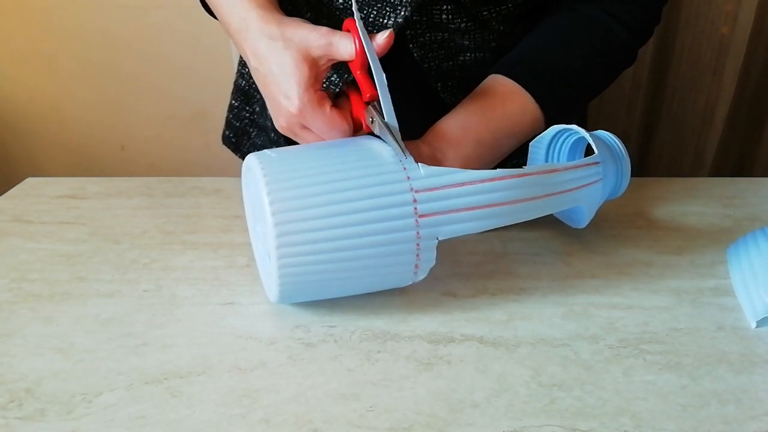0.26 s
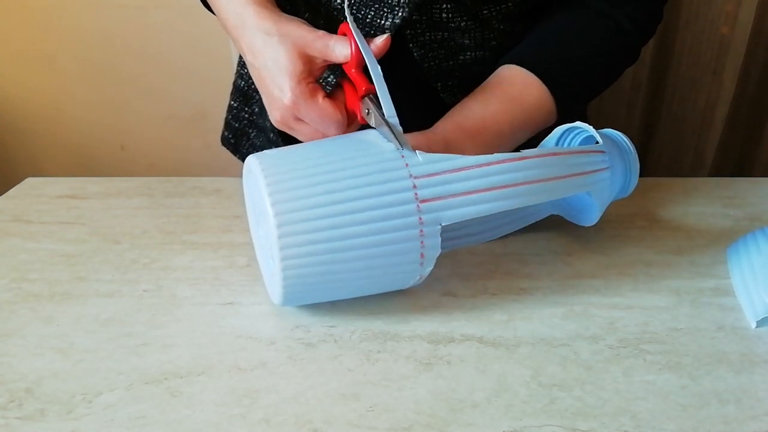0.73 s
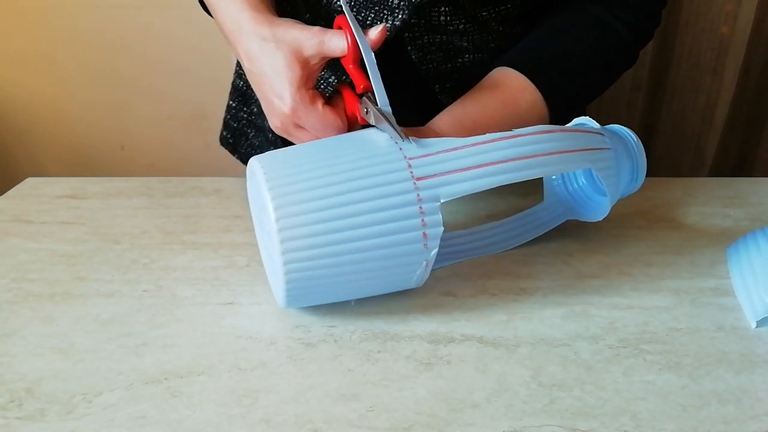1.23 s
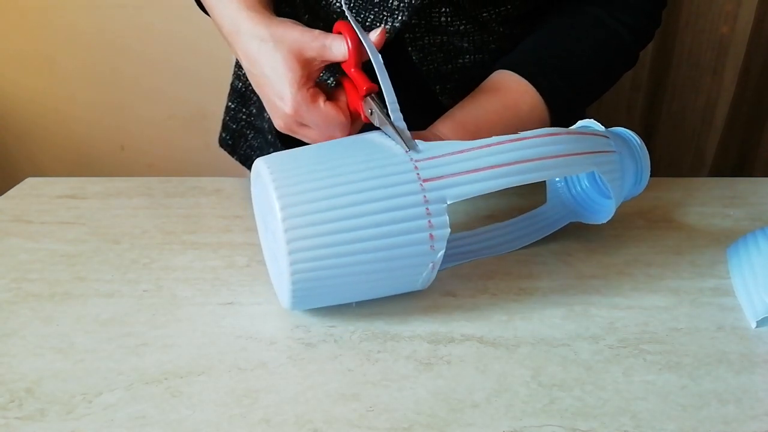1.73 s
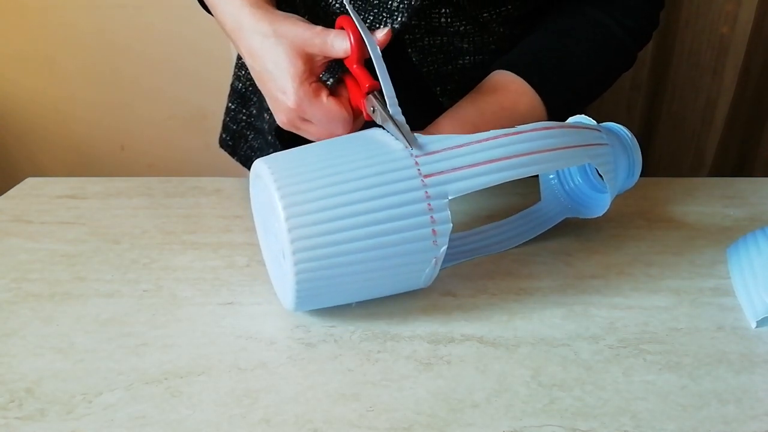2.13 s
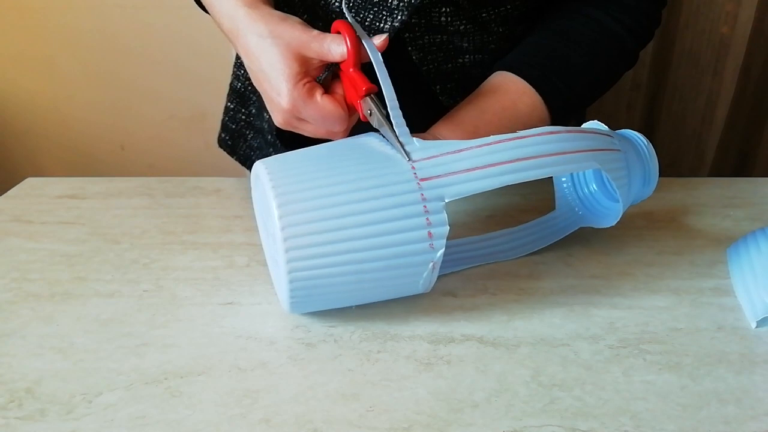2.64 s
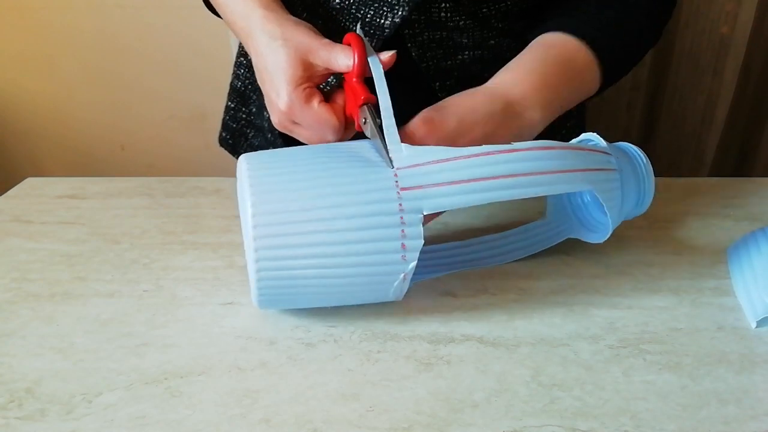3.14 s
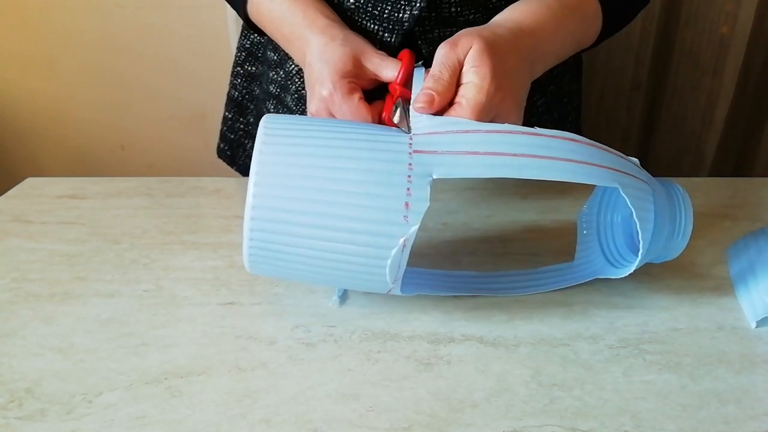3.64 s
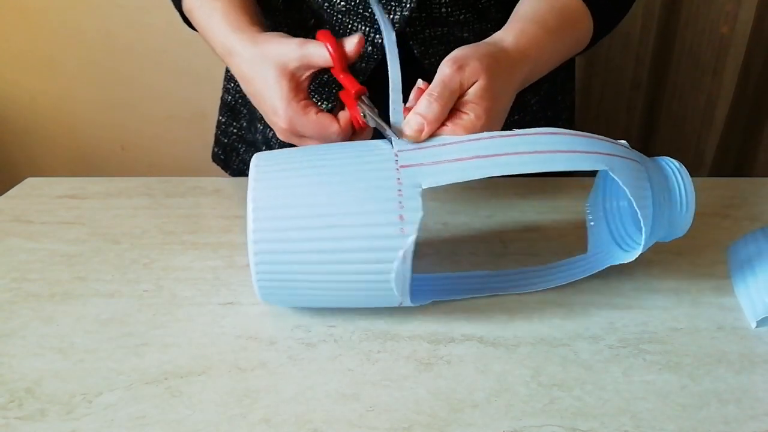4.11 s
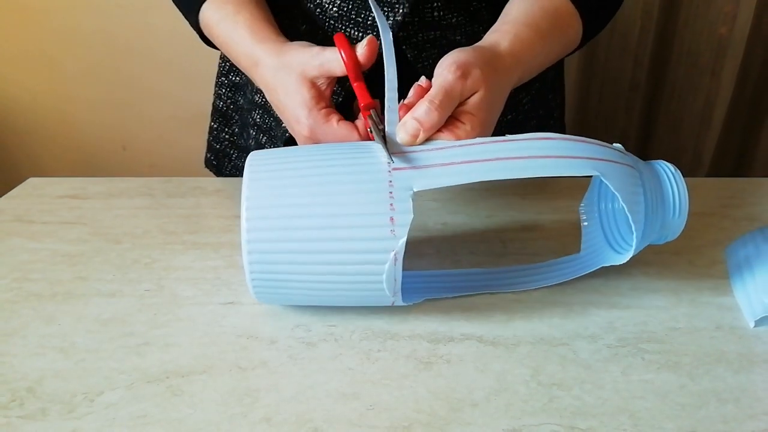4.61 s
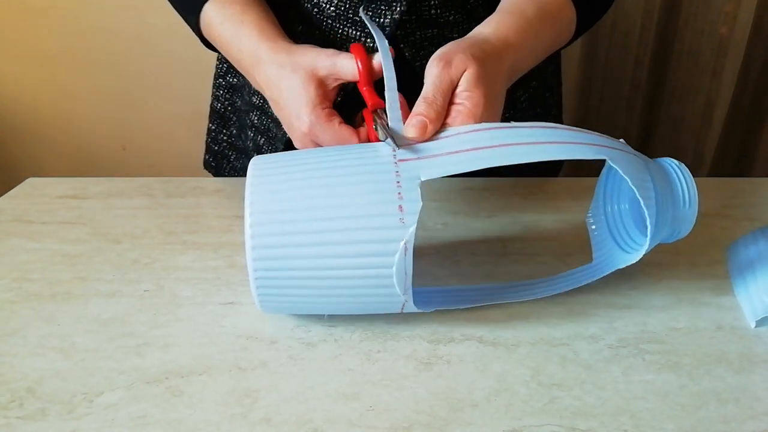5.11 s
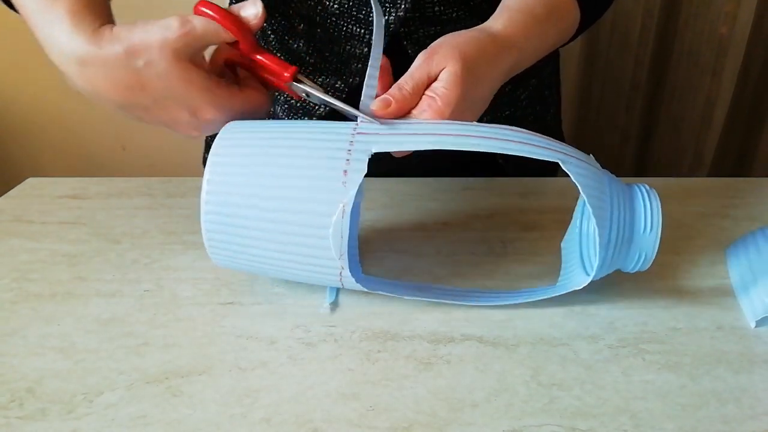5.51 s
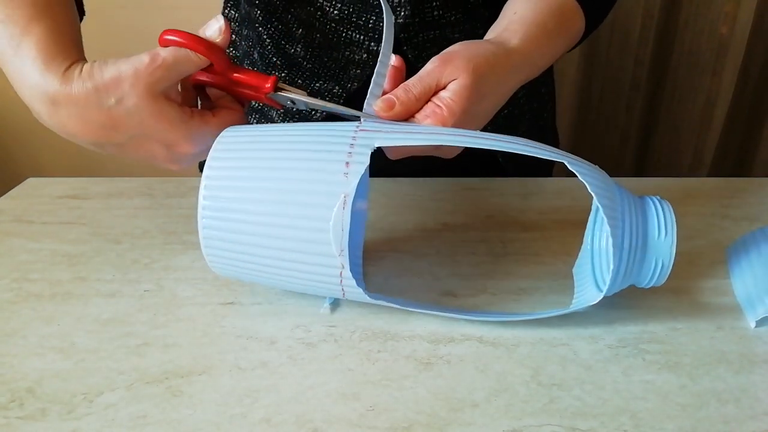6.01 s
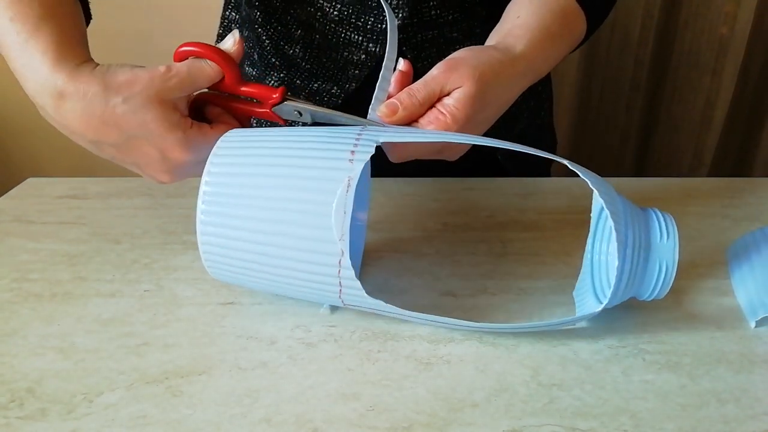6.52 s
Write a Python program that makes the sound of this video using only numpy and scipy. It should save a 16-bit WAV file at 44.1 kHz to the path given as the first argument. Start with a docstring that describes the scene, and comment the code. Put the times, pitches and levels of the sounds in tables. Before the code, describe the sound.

A close stereo pickup in a small, quiet, fairly dry room with a faint steady hush. From 0 to 1.8 seconds, scissors bite thin ribbed plastic: short hissing shears, dry creaks and irregular snaps, clustered around 0.4 to 1.1, with a brief squeak near 0.95 and a hard crack near 1.55. From 1.8 to 2.4 it falls to faint ticks and rustle. Snaps return at 2.5, and a loud, duller pop lands at 2.75, followed by a longer crunching shear around 3.05 to 3.2. A quieter stretch with weak squeaky rubbing runs to 3.8. Firm cuts and soft thuds come at 3.9 to 4.4, then a pause. From 4.9 to 5.4 the cutting is densest, with a hollow low bump at 5.25. Bright, thin metallic scrapes flick past from 5.5 to 5.8. Near quiet follows, with small snaps at 6.25 and 6.37.

```python
"""A faint shearing hiss and creak over a quiet hush comes first: scissors cut an opened plastic bottle on a table.
Stick-slip friction drives the resonant modes of the wall; impulses make it snap as ribs give way.
The hollow body hums at its low modes, the table gives soft low-passed thuds, and a blade may squeak on a note.
Late on, bright scrapes carry a moving resonance; short reverberation reaches two nearby microphone ports."""
import sys
import numpy as np
from scipy import signal
from scipy.fft import rfft, irfft, next_fast_len
from scipy.io import wavfile
from scipy.ndimage import uniform_filter1d

SR = 44100
rng = np.random.default_rng(int(sys.argv[2]) if len(sys.argv) > 2 else 0)


def unload_wav(signal):
    """Save mono or channel-first audio to the path in sys.argv[1] as 16-bit WAV at rate SR, clipped to [-1, 1]."""
    wavfile.write(
        sys.argv[1],
        SR,
        np.round(np.clip(np.atleast_2d(signal).T, -1, 1) * 32767).astype(np.int16),
    )


N = 297675  # samples

# Hush of room and microphone: (frequency [Hz], relative density [dB])
HUSH_SPECTRUM = [(12, -15), (20, 0.5), (44, -6.5), (210, -5.5), (527, -20.5), (642, -13), (976, -17.5),
                 (1150, -12), (1400, -17), (2080, -19), (5850, -24.5), (8180, -19.5), (10200, -29.5),
                 (14700, -29), (16000, -22.5)]
HUSH_DB = -67
# Left-right likeness of the hush: (frequency [Hz], correlation [-1 to 1])
HUSH_LIKENESS = [(60, 1), (240, 0.45), (950, -0.35), (3770, 0.053), (15000, -0.23)]

# Strokes of the blades: (bite time [s], rise before it [s], hold [s], wall level [dB],
# pitch of the flexed patch [Hz], blade hiss level [dB])
STROKES = [(0, .05, .001, -62, 1815, -56.5), (0.197, 0.034, .01, -52, 1700, -56.5),
           (0.44, 0.082, 0.0075, -53, 1910, -49), (0.517, 0.047, .07, -57.5, 1600, -56),
           (0.683, 0.045, 0.064, -64, 1840, -64), (0.802, 0.2, 0.048, -51, 1900, -53.5),
           (0.987, 0.05, .001, -50, 1720, -47.5), (1.093, 0.094, 0.032, -46, 1054, -49.5),
           (1.423, 0.024, 0.078, -61, 1700, -53), (1.562, 0.15, 0.06, -50.5, 1258, -53),
           (1.782, 0.007, 0.034, -53, 1343, -56.5), (2.111, 0.071, .02, -64.5, 1250, -60.5),
           (2.288, 0.25, 0.008, -66, 1750, -66.5), (2.53, 0.046, 0.074, -58.5, 1200, -61),
           (2.647, 0.32, 0.009, -54.5, 1506, -57), (2.799, 0.053, 0.096, -46, 663, -64),
           (3.05, 0.028, 0.17, -44.5, 1200, -45.5), (3.385, 0.33, .03, -59.5, 1580, -50.5),
           (3.581, 0.13, 0.0072, -62.5, 1420, -53), (3.678, 0.1, 0.0058, -57, 1660, -58.5),
           (3.894, 0.071, 0.0268, -53, 1850, -46), (3.956, 0.066, 0.0942, -49.5, 1310, -50.5),
           (4.124, 0.082, 0.0356, -42.5, 1040, -50), (4.36, 0.078, 0.0017, -47.5, 762, -50.5),
           (4.765, .04, 0.1, -64.5, 1660, -70), (4.895, 0.039, 0.082, -65.5, 1414, -57),
           (4.979, 0.089, 0.021, -49, 850, -43), (5.079, 0.083, .02, -54.5, 1128, -56),
           (5.159, 0.045, 0.013, -66, 1400, -44.5), (5.214, 0.05, 0.0425, -42.5, 830, -50),
           (5.265, 0.16, 0.39, -43, 897, -41), (5.524, 0.14, 0.18, -51, 1820, -51),
           (5.707, 0.14, 0.11, -57.5, 2000, -55), (5.996, 0.43, 0.078, -81, 1315, -71),
           (6.254, 0.074, 0.0654, -62.5, 1036, -84), (6.366, 0.2, 0.0045, -54.5, 1670, -50.5),
           (6.666, 0.37, 0.025, -73.5, 1250, -67)]
RISE_DB = 30  # climbed during any rise
WALL_SAG, WALL_FADE, HISS_SAG, HISS_FADE = 115, 228, 96, 267  # dB per s, in the hold and after it
# Modes of the wall: (frequency [Hz], width [Hz], relative level [dB])
WALL_MODES = [(577, 210, -32.5), (699, 66, -3.5), (747, 31, -0.5), (853, 40, -6.5), (930, 320, -10.5),
              (1160, 29, 0.5), (1263, 115, 10.5), (1536, 200, 9), (1717, 143, 15.5), (2013, 160, 16),
              (2160, 165, 15.5), (2545, 274, 10), (2890, 320, 16), (3530, 190, 11.5), (4330, 430, -13.5)]
WALL_BAND_HZ = (510, 5200)  # the wall radiates mainly between these
FAR_SHARE = 0.04  # of the force that reaches modes far from the patch
# Colour of hiss and cracks at the microphone: (frequency [Hz], relative level [dB])
EDGE_SPECTRUM = [(300, -21), (1500, -20), (3500, -1.5), (5800, -9.5), (7200, -4.5), (8400, 5), (9500, -4),
                 (11500, -23.5), (16000, -32)]

# Knocks of the bottle on the table: (time [s], hold [s], table level [dB],
# deep part relative to the table level [dB], hollow body level [dB], pitch of the hum [Hz])
KNOCKS = [(.713, 0.11, -60.5, 6, -66, 347), (0.981, 0.03, -66.5, 2, -53, 371.3),
          (1.09, 0.016, -76, 2, -63.5, 343), (1.57, .02, -65, 11, -58, 330),
          (2.771, 0.0061, -73, -4, -54, 348), (3.071, 0.048, -68, 17, -56.5, 335),
          (3.365, 0.16, -62, -4, -63.5, 361.4), (3.911, 0.053, -67, 7, -53.5, 345.6),
          (4.132, 0.014, -53.5, 8, -47.5, 350.4), (4.368, 0.0099, -61, -21, -56, 360),
          (4.997, .02, -58, 5, -57.5, 306.5), (5.249, 0.037, -47.5, -12, -34.5, 350.6),
          (5.449, 0.059, -66, -9, -46.5, 382.2), (5.543, 0.011, -56, -11, -52.5, 370),
          (5.584, 0.028, -56, -14, -54.5, 190), (5.588, 0.022, -80, 0, -50, 344),
          (6.275, 0.08, -65.5, -2.5, -63.5, 338)]
TABLE_RISE_S, HOLLOW_RISE_S = 0.07, 0.078
KNOCK_SAG, TABLE_FADE, HOLLOW_FADE = 74, 92, 154  # dB per s
PUSH_TABLE_DB, PUSH_HOLLOW_DB = -12.5, -12.5  # push of each stroke, relative to its wall level
# Colour of the thuds: (frequency [Hz], relative level [dB])
TABLE_SPECTRUM = [(25, -6), (50, -11), (85, 2.5), (140, 1.5), (200, 5.5), (300, 4), (600, -78)]
DEEP_HZ = 110  # split between the deep and upper part of a thud
# Modes of the air and base of the body: (frequency [Hz], width [Hz], relative level [dB])
HOLLOW_MODES = [(190, 24, -12), (292, 24, -15), (345, 11, 0), (374, 14, -2)]
HOLLOW_BAND_HZ = (170, 430)  # the body hums mainly between these
HUM_OCT = 0.065  # spread of the modes rung at 360 Hz, wider away from it
LOCK_SHARE = 0.68  # share of the knock's hum amplitude locked on to one note
WAVER = .01  # rms wander of that note, as a fraction of its pitch

# Snaps of the wall: (time [s], peak level of the wall [dB], pitch of the flexed patch [Hz],
# hollow body relative to the wall [dB], crisp edge relative to the wall [dB])
SNAPS = [(0.179, -43, 2030, -34, -6), (0.397, -41, 1800, -21, -1.5), (0.441, -30, 1940, -23.5, -35),
         (0.567, -45.5, 2000, -30, 4.5), (0.651, -43.5, 2150, -30, 0), (0.661, -39, 2040, -47, 5.5),
         (0.698, -37.5, 2460, -14.5, 1.5), (0.768, -29, 1520, -30, 1.5), (0.786, -27.5, 2400, -39, -9),
         (0.796, -43, 1250, -7, -4), (0.918, -34, 1250, -3, 1.5), (0.988, -31, 1600, -21, -6),
         (1.081, -39, 736, -5, 3), (1.438, -39, 1790, -50, -3), (1.48, -40.5, 730, -29, -24),
         (1.565, -24.5, 1340, -27, -2.5), (1.786, -49, 1240, -9.5, -19), (1.915, -58.5, 1240, -42, -20),
         (2.026, -60, 1240, -57, 6.5), (2.083, -51.5, 1900, -25, 6), (2.119, -48, 1210, -32, 10),
         (2.141, -50.5, 1900, -33, 5), (2.213, -47.5, 1300, -47, -33), (2.301, -35.5, 2010, -64, -6),
         (2.447, -49, 730, -21, -40), (2.464, -40, 710, -38, -13), (2.51, -32, 700, -48, -5),
         (2.521, -25, 1900, -23.5, -10), (2.637, -33.5, 1800, -25, 6.5), (2.727, -39.5, 695, -22, 2),
         (2.754, -15.5, 694, -26, -10.5), (2.834, -45, 660, -32, -44), (3.036, -40.5, 1080, -6, 11),
         (3.049, -39, 1500, -25, 12), (3.115, -35, 1070, -19, 13), (3.126, -39, 1060, -38, 1),
         (3.155, -47.5, 1190, -34, 18), (3.201, -53.5, 1200, -30, 12.5), (3.605, -44.5, 1650, -47, -19),
         (3.669, -44, 2050, -37, -29), (3.885, -44.5, 2150, -28, 8), (3.95, -28.5, 1650, -25, 8.5),
         (4.031, -37, 1130, -65, 8), (4.119, -27.5, 820, -9, -2), (4.129, -33, 710, -2, 11),
         (4.382, -35, 1300, -13, -4), (4.755, -46, 2040, -18, -1.5), (4.869, -47, 1450, -30, 9.5),
         (4.899, -43.5, 1180, -30, -24), (4.979, -28.5, 930, -32, -10), (5.026, -37.5, 1060, -35, 10.5),
         (5.071, -38.5, 3490, -23, 7), (5.082, -34, 1130, -66, 14), (5.116, -51, 1100, -37, 15),
         (5.197, -36, 780, -37, 14), (5.236, -33.5, 690, -9.5, 3), (5.267, -24.5, 850, -11, 7),
         (5.342, -50, 1110, -19, 20), (5.538, -45, 2130, -14, 3), (6.25, -37, 1300, -16, -1),
         (6.37, -45, 1840, -42, 12.5)]
SNAP_OCT, SNAP_OCT_PER_DB = 0.67, -0.05  # spread of the modes rung: wider as the body's part weakens
SNAP_DETUNE = .015  # rms shift of each bent-wall mode from snap to snap, as a fraction
SNAP_WIDTH = 0.99  # factor on the mode widths in a snap

# Squeaks, a blade rubbing one patch of the wall on a note:
# (time [s], rise before it [s], hold [s], level [dB], pitch [Hz])
SQUEAKS = [(0.182, 0.017, 0.041, -56, 1934), (0.874, 0.018, .008, -60, 1670),
           (0.964, 0.059, 0.016, -42.5, 1740), (1.528, 0.025, 0.025, -56, 1970),
           (1.581, 0.038, 0.076, -56, 737), (2.204, 0.018, 0.0097, -59.5, 1288),
           (3.304, 0.048, 0.045, -59.5, 1450), (3.363, 0.049, 0.081, -56, 1500),
           (3.56, 0.48, 0.09, -62, 1550), (3.859, .03, 0.052, -64, 2130), (5.727, 0.067, 0.091, -64, 2110)]
SQUEAK_OCT, SQUEAK_SAG, SQUEAK_FADE = 0.086, 58, 620  # octaves, then dB per s

# Scrapes of the blades drawn out along the cut: (time [s], hold [s], level [dB])
SCRAPES = [(5.504, 0.016, -41), (5.534, 0.0059, -33.5), (5.548, 0.0049, -55), (5.639, .005, -49.5),
           (5.661, 0.0057, -45), (5.671, 0.045, -45.5), (5.76, 0.0044, -49.5)]
SCRAPE_LOW_HZ, SCRAPE_RISE_S = 4800, .008
SCRAPE_SAG, SCRAPE_FADE = 30, 900  # dB per s
# Ring of the blade: (time [s], frequency [Hz])
BLADE_SLIDE = [(5.5, 9750), (5.62, 7600), (5.66, 8300), (5.8, 7200)]
SLIDE_WIDTH_HZ, SLIDE_DB = 550, 4
UNDER_SHARE, UNDER_DB = 0.666, 6.5  # a second ring at this share of the pitch

# The cutting edge wanders as the bottle is turned: (time [s], left over right [dB])
EDGE_PAN = [(0.0, 2), (5.3, 2), (5.52, 7), (5.7, 3), (6.75, 2)]
BODY_LAG_S, EDGE_LAG_S = .00008, .0001688  # both reach the left port first
# Reverberation time of the room: (frequency [Hz], time to fall 60 dB [s])
ROOM_T60 = [(200, 0.047), (530, 0.25), (1400, 0.12), (3700, 0.26), (9700, 0.18)]
ROOM_DB = -0.5
WIDE_HZ = 176  # below this the room sounds mostly alike in both ports
CUTOFF_HZ = 15800


def gain_of(db):
    """Level: the amplitude ratio of a number of decibels."""
    return 10 ** (np.asarray(db) / 20)


def evened(x):
    """Normalization: scales a signal to rms 1."""
    return x / np.sqrt(np.mean(x ** 2) + 1e-20)


def read(points, hz):
    """Interpolation: reads a spectrum on a log-frequency axis."""
    f, value = np.transpose(points)
    return np.interp(np.log(hz + 1), np.log(f + 1), value)


def add(mix, s, sound):
    """Superposition: mixes a sound in at time s."""
    part = mix[..., round(s * SR):][..., :sound.shape[-1]]
    part += sound[..., :part.shape[-1]]


def filtered(x, order, hz, kind):
    """Selective transmission: a Butterworth filter."""
    return signal.sosfilt(signal.butter(order, hz, kind, fs=SR, output="sos"), x)


def wander(size):
    """Slow fluctuation: noise averaged twice over size samples, at rms 1."""
    once = uniform_filter1d(rng.standard_normal(N), size)
    return evened(uniform_filter1d(once, size))


def colour(x, points):
    """Minimum phase: a causal filter of the given spectrum, with unit energy."""
    log_gain = np.log(gain_of(read(points, abs(np.fft.fftfreq(8192, 1 / SR)))))
    response = np.exp(np.conj(signal.hilbert(log_gain)))
    taps = np.fft.ifft(response).real[:4096]
    return signal.oaconvolve(x, taps / np.linalg.norm(taps))[:len(x)]


def spread(curve):
    """Interpolation: from 1 ms steps to samples."""
    return np.interp(np.arange(N) / SR, np.arange(len(curve)) * .001, curve)


def swells(s, rise_s, hold_s, db, sag, fade):
    """Exponential growth and decay: power of each event in 1 ms steps (rise, sagging hold, fade)."""
    t = np.arange(0, N / SR + .002, .001) - s[:, None]
    rise_s = (rise_s * np.ones(len(s)))[:, None]
    hold_s = hold_s[:, None]
    lost_db = RISE_DB * np.maximum(-t, 0) / rise_s
    lost_db += sag * np.clip(t, 0, hold_s) + fade * np.maximum(t - hold_s, 0)
    return gain_of(np.maximum(db[:, None] - lost_db, -200)) ** 2


def slips(per_s, spread_db, smooth):
    """Stick-slip friction: random jerks of uneven size over steady noise."""
    hits = rng.random(N) < per_s / SR
    signs = rng.choice([-1, 1], N)
    sizes = gain_of(spread_db * np.minimum(rng.exponential(1, N), 4))
    jerks = evened(hits * signs * sizes)
    return evened((1 - smooth) * jerks + smooth * rng.standard_normal(N))


def ring(force, modes, patch_hz=None, octaves=.8):
    """Modal resonance: modes near the pitch of the flexed patch take most of a steady total power."""
    out, power = np.zeros(len(force)), 0
    for hz, width, db in modes:
        near = 1
        if patch_hz is not None:
            near = FAR_SHARE + np.exp(-(np.log2(hz / patch_hz) / octaves) ** 2)
        r, turn = np.exp(-np.pi * width / SR), 2 * np.pi * hz / SR
        mode = signal.lfilter([np.sin(turn)], [1, -2 * r * np.cos(turn), r * r], near * force)
        out += mode * gain_of(db)
        power += (near * gain_of(db)) ** 2 / width
    return out / np.sqrt(power)


def wall_ring(force, patch_hz, octaves, modes=WALL_MODES):
    """Radiation of a thin wall: its modes, weakened outside the radiating band."""
    return filtered(ring(force, modes, patch_hz, octaves), 4, WALL_BAND_HZ, "band")


def hollow_ring(force, hum_hz):
    """Cavity resonance: the body's low modes, weakened outside their band."""
    octaves = HUM_OCT + abs(np.log2(hum_hz / 360))
    return filtered(ring(force, HOLLOW_MODES, hum_hz, octaves), 2, HOLLOW_BAND_HZ, "band")


def resonate(x, hz, width_hz):
    """Heterodyning: a moving resonance of gain 1, low-passed around its own carrier."""
    turn, r = np.exp(2j * np.pi * np.cumsum(hz) / SR), np.exp(-np.pi * width_hz / SR)
    return 2 * (turn * signal.lfilter([1 - r], [1, -r], x / turn)).real


def hush():
    """Diffuse noise: steady and spectrally shaped, with a correlation between ports set by frequency."""
    frames, hz = N // 256 + 5, np.fft.rfftfreq(1024, 1 / SR)
    a, b, c, d = rng.standard_normal((frames, 513, 4)).T
    same = read(HUSH_LIKENESS, hz)[:, None]
    left = a + 1j * b
    right = same * left + np.sqrt(1 - same ** 2) * (c + 1j * d)
    z = np.array([left, right]) * gain_of(read(HUSH_SPECTRUM, hz))[:, None]
    noise = signal.istft(z, nperseg=1024, noverlap=768)[1][:, :N]
    return gain_of(HUSH_DB) * evened(noise)


def strokes():
    """Power addition: wall dB, patch pitch and hiss dB of all strokes; the strongest dominates the pitch."""
    s, rise_s, hold_s, wall_db, patch_hz, hiss_db = np.transpose(STROKES)
    wall = swells(s, rise_s, hold_s, wall_db, WALL_SAG, WALL_FADE)
    hiss = swells(s, rise_s, hold_s, hiss_db, HISS_SAG, HISS_FADE)
    total_wall_db = 10 * np.log10(wall.sum(0))
    total_hiss_db = 10 * np.log10(hiss.sum(0))
    return spread(total_wall_db), spread(patch_hz @ wall / wall.sum(0)), spread(total_hiss_db)


def shear():
    """Friction-driven resonance: the dragged wall creaks and the edge hisses, in gusts as the grip wavers."""
    wall_db, patch_hz, hiss_db = strokes()
    grip_db = 2.2 * wander(250)
    catch_db = 3.75 * wander(90)  # the edge catches on burrs
    # dull bending with little hiss stirs fewer modes
    octaves = np.clip(0.86 + 0.0093 * (hiss_db - wall_db), .15, 1.2)
    creak = evened(wall_ring(slips(400, 4.3, 0.62), patch_hz, octaves))
    wall = creak * gain_of(wall_db + grip_db)
    hiss = colour(slips(2500, 4.0, 0.55), EDGE_SPECTRUM) * gain_of(hiss_db + grip_db + catch_db)
    return np.array([wall, hiss])


def handling():
    """Forced vibration: knocks and strokes push the bottle; the table thuds low and the hollow body hums."""
    s, hold_s, table_db, deep_db, hollow_db, hum_hz = np.transpose(KNOCKS)
    push = gain_of(strokes()[0])

    def thud_level(db):
        """Power addition: the knocks' table level joined by the push of the strokes."""
        power = swells(s, TABLE_RISE_S, hold_s, db, KNOCK_SAG, TABLE_FADE).sum(0)
        return np.hypot(np.sqrt(spread(power)), gain_of(PUSH_TABLE_DB) * push)

    upper, deep = thud_level(table_db), thud_level(table_db + deep_db)
    power = swells(s, HOLLOW_RISE_S, hold_s, hollow_db, KNOCK_SAG, HOLLOW_FADE)
    warped_s = np.cumsum(1 + WAVER * wander(900)) / SR
    notes = sum(np.sqrt(2 * spread(p)) * np.sin(2 * np.pi * hz * warped_s) for p, hz in zip(power, hum_hz))
    hollow = np.sqrt(spread(power.sum(0)))
    mean_hum_hz = spread(hum_hz @ power / power.sum(0))
    lumps = colour(rng.standard_normal(N), TABLE_SPECTRUM)
    low = signal.sosfiltfilt(signal.butter(2, DEEP_HZ, fs=SR, output="sos"), lumps)
    table = low * deep + (lumps - low) * upper
    hum = evened(hollow_ring(slips(440, 1.5, 0.55), mean_hum_hz))
    hum_level = np.hypot((1 - LOCK_SHARE) * hollow, gain_of(PUSH_HOLLOW_DB) * push)
    return table, LOCK_SHARE * notes + hum * hum_level


def snaps():
    """Impulse response: a jolt and a few ms of splitting crack, ring the wall and set the body ringing."""
    out, t = np.zeros((2, N)), np.arange(4500) / SR
    noise = rng.standard_normal((len(SNAPS), 2, len(t)))
    split = (1 - np.exp(-t / 0.00066)) * np.exp(-t / 0.0038)
    burst = (1 - np.exp(-t / 0.0017)) * np.exp(-t / 0.0022)
    cracks = colour((noise[:, 1] * burst).ravel(), EDGE_SPECTRUM).reshape(len(SNAPS), -1)
    jolt = (1 - np.exp(-t / .00005)) * np.exp(-t / 0.00004)
    hollow = ring(jolt, HOLLOW_MODES[-1:])
    bend = 1 + SNAP_DETUNE * rng.standard_normal((len(SNAPS), len(WALL_MODES)))
    for snap, tearing, crack, shift in zip(SNAPS, noise[:, 0], cracks, bend):
        s, db, patch_hz, hollow_db, crisp_db = snap
        modes = [(hz * k, width * SNAP_WIDTH, mode_db) for (hz, width, mode_db), k in zip(WALL_MODES, shift)]
        octaves = SNAP_OCT + SNAP_OCT_PER_DB * hollow_db
        wall = wall_ring(jolt + .5 * tearing * split, patch_hz, octaves, modes)
        wall, body, crack = (x / abs(x).max() for x in (wall, hollow, crack))
        sound = np.array([wall + gain_of(hollow_db) * body, gain_of(crisp_db) * crack])
        add(out, s, gain_of(db) * sound)
    return out


def squeaks():
    """Selective excitation: dense slips ring mainly the modes next to the rubbed patch."""
    s, rise_s, hold_s, db, patch_hz = np.transpose(SQUEAKS)
    power = swells(s, rise_s, hold_s, db, SQUEAK_SAG, SQUEAK_FADE)
    mean_patch_hz = spread(patch_hz @ power / power.sum(0))
    rung = wall_ring(slips(970, 2.7, 0.26), mean_patch_hz, SQUEAK_OCT)
    return evened(rung) * np.sqrt(spread(power.sum(0)))


def scrapes():
    """Friction through moving resonances: fine slips of steel on the cut edge, thin and bright."""
    s, hold_s, db = np.transpose(SCRAPES)
    rub = colour(slips(3000, 3.9, 0.47), EDGE_SPECTRUM)
    hz = np.interp(np.arange(N) / SR, *np.transpose(BLADE_SLIDE))
    blade = gain_of(SLIDE_DB) * resonate(rub, hz, SLIDE_WIDTH_HZ)
    under = gain_of(UNDER_DB) * resonate(rub, UNDER_SHARE * hz, SLIDE_WIDTH_HZ)
    thin = filtered(rub + blade + under, 4, SCRAPE_LOW_HZ, "high")
    power = swells(s, SCRAPE_RISE_S, hold_s, db, SCRAPE_SAG, SCRAPE_FADE).sum(0)
    return evened(thin) * np.sqrt(spread(power))


def ports(x, lag_s, pan_db):
    """Interaural differences: one source reaches the right port later, with a level difference."""
    size = 2 * next_fast_len(N // 2 + 2048)
    delay = np.exp(-2j * np.pi * np.fft.rfftfreq(size, 1 / SR) * lag_s)
    late = irfft(rfft(x, size) * delay, size)[:N]
    return np.array([x * gain_of(pan_db / 2), late * gain_of(-pan_db / 2)])


def room(x):
    """Reverberation: sparse echoes of random sign, each band decaying at its own rate; three tails take turns."""
    out, turn = np.zeros((2, N)), 2 * np.pi * 3.1 * np.arange(N) / SR
    for k in range(3):
        taps = np.zeros((2, SR // 2))
        starts = np.arange(150, SR // 2 - 20, 20)
        at = starts + rng.integers(0, 20, (2, len(starts)))
        np.put_along_axis(taps, at, rng.choice([-1., 1.], at.shape), 1)
        hz, t, z = signal.stft(taps, SR, nperseg=256)
        decay = gain_of(-60 * t / read(ROOM_T60, hz)[:, None])
        tail = signal.istft(z * decay, SR, nperseg=256)[1]
        share = np.sqrt(2 / 3) * np.cos(turn + 2 * np.pi * k / 3)
        out += signal.fftconvolve((x * share)[None], tail / np.linalg.norm(tail[0]), axes=1)[:, :N]
    return out


def scene():
    """Superposition: direct sound at the two ports, its room, the table and the hush."""
    table, hollow = handling()
    wall, edge = shear() + snaps()
    wall, edge = wall + squeaks(), edge + scrapes()
    edge_pan_db = np.interp(np.arange(N) / SR, *np.transpose(EDGE_PAN))
    near = ports(wall + hollow, BODY_LAG_S, pan_db=-1.5) + ports(edge, EDGE_LAG_S, edge_pan_db)
    left, right = gain_of(ROOM_DB) * room(wall + gain_of(-0.5) * hollow + gain_of(-2.5) * edge)
    middle = (left + right) / 2
    side = filtered(left - right, 2, WIDE_HZ, "high") / 2
    return near + middle + np.array([side, -side]) + table + hush()


def record(dry):
    """Band limitation: a linear-phase low-pass."""
    taps = signal.firwin(511, CUTOFF_HZ, window=("kaiser", 9), fs=SR)
    return signal.oaconvolve(dry, taps[None], "same")


dry = scene()
out = record(dry)
unload_wav(out)
```